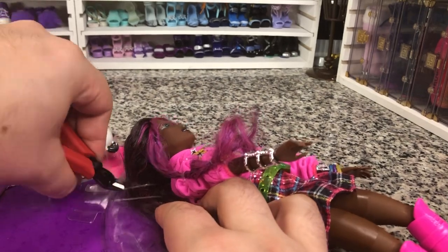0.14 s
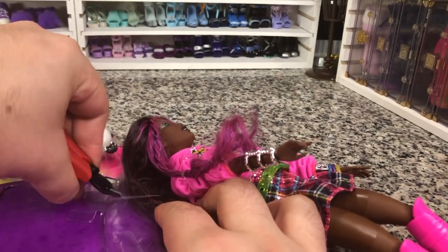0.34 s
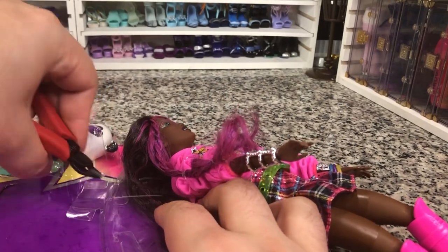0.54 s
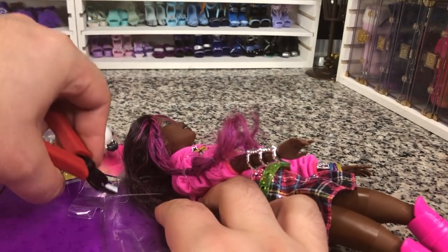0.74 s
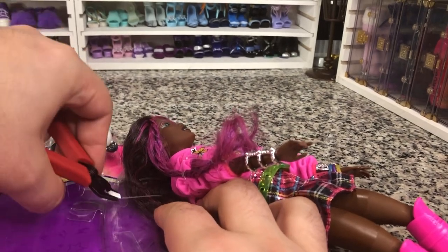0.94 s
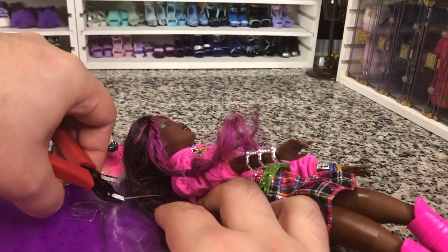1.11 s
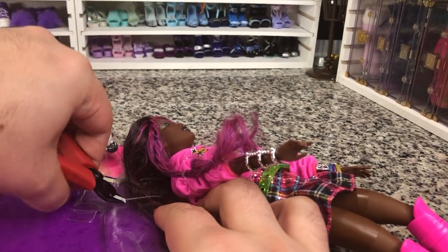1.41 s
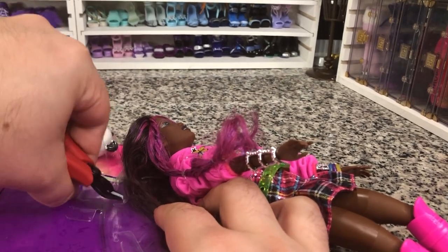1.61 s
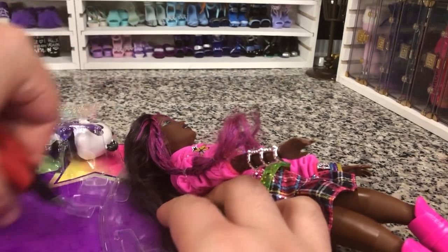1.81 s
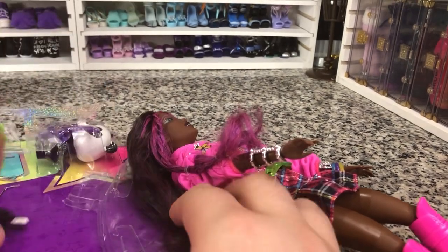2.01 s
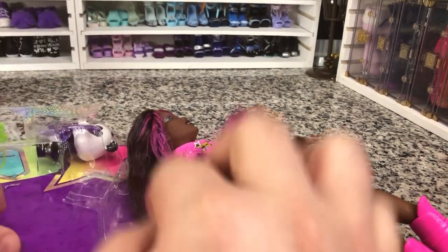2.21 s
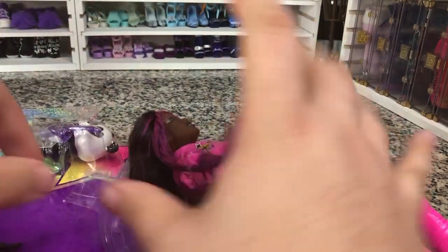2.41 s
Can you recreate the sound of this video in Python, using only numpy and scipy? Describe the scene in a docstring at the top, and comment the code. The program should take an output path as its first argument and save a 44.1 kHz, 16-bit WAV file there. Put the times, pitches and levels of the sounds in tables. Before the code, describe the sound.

Small nippers make two crisp, dry snips over a second apart, with light plastic ticks and rustling between; then the tray creaks, pops and thumps as a toy is pulled free, close-miked in a quiet room.

```python
"""In a small furnished room, nippers snip two rubber ties on a plastic and card toy tray on a stone counter.
Snips and tray cracks are spiked noise bursts with short rings, coloured by resonances, with a rattle and room tail.
Thumps are damped sines; the rustle is gritty noise of changing brightness; scrapes are narrow noise bands.
The tray ticks, creaks and rustles under the fingers, then pops and thumps as the toy is pulled loose.
Behind it lie shaped-noise room air and a wavering sine hum at mains pitch."""
import sys
import numpy as np
from scipy import signal
from scipy.fft import rfft, irfft, next_fast_len
from scipy.io import wavfile
from scipy.ndimage import uniform_filter1d, map_coordinates

SR = 44100
rng = np.random.default_rng(int(sys.argv[2]) if len(sys.argv) > 2 else 0)


def output_pcm(signal):
    """Save a mono or channel-first signal as 16-bit PCM at the path in sys.argv[1].

    Samples are clipped to [-1, 1] before scaling.
    """
    pcm = np.clip(np.atleast_2d(signal).T, -1, 1) * 32767
    wavfile.write(sys.argv[1], SR, np.round(pcm).astype(np.int16))


N = 112454  # length in samples

# Nipper snips and tray cracks, levels ahead of body and microphone colour: (time [s], level [dB],
# 0.2-0.9 kHz [dB over level], 0.9-2 kHz [dB over level], 2-4 kHz [dB over level],
# 11-16 kHz [dB over level], base t60 [s], ring pitch [Hz], ring [dB over level])
SNIPS = [(0.2347, -12, -26.5, -3.5, -1.5, 4.5, 0.0095, 1939, -5.5),
         (1.5921, -9, -18, -11, -2.5, -5.5, 0.013, 5520, 3)]
CRACKS = [(0.0766, -58, -17, 0, 1.5, -14, 0.012, 2100, -4),
          (0.1109, -45, -8, 0.5, -4, -9, 0.022, 3080, -3.5),
          (0.1328, -52, -20.5, -10, -4.5, 1, 0.014, 2100, -5),
          (0.2047, -46.5, -14.5, -13, 4.5, -11, 0.018, 2050, -8),
          (0.2463, -29, -1, 4, -4.5, -10, 0.013, 1970, -12),
          (0.2516, -32.5, 1, -14, -7, -14, 0.006, 4230, -3),
          (0.26, -27.5, -17, 4, -1.5, -14, 0.013, 2080, -5.5),
          (0.332, -48, -25, -10, 3, -4, 0.026, 3640, -3),
          (0.3618, -44, -22, 0, 3.5, -14, 0.019, 1840, -1.5),
          (0.368, -42.5, -18, -0.5, -5, -21, 0.018, 4900, 8), (0.3923, -56, -14, 9, 8, -14, 0.023, 2060, 2),
          (0.41, -37.5, -10.5, -11, -6, -12, 0.028, 3680, -6),
          (0.4721, -39.5, -13, -15, -13, -30, 0.019, 5550, -23),
          (0.5737, -56.5, -10, 7, -5, -26, 0.015, 1710, -10),
          (0.6654, -45, -12.5, -2.5, -4.5, -4, 0.006, 1965, -12.5),
          (0.787, -35, -5.5, -6, -5.5, -7.5, 0.019, 4060, -2),
          (0.8083, -48.5, -14.5, -11, -2, -2, 0.0098, 4180, 5),
          (0.8124, -48, -21, 1, -1, -18, 0.018, 3970, -4), (0.8193, -50, -24, 5, -1, -5, 0.016, 4040, 2),
          (0.8371, -56, -18, -15, -9, -3, 0.013, 4000, 6),
          (0.8476, -57.5, -14, -5, -7, -12, 0.011, 4090, 3),
          (1.0123, -58, -17, -5, 0, -13.5, 0.014, 4830, 1.5),
          (1.4247, -48.5, -26, 0.5, 1, -10, 0.022, 5840, -5.5),
          (1.4397, -50.5, -2, 0, 4.5, -6, 0.031, 3630, -1.5),
          (1.4476, -53, -9, 6, -3, -14, 0.018, 4690, -4),
          (1.4551, -49, -13.5, 3.5, 0.5, -15, 0.028, 1710, -7),
          (1.4595, -51, -22, -3, 1, -9, 0.021, 1680, -4),
          (1.4691, -46.5, -22, 4, 3.5, -14, 0.019, 2020, -4),
          (1.5449, -42, -4.5, 2, 0.5, -10, 0.032, 3530, 0.5), (1.562, -40, -3, -4, 2, -14, 0.021, 5260, -5),
          (1.8054, -48.5, -7, -28, -11, -16, 0.025, 6110, -17),
          (1.833, -43, -18, -19, -5, -6, 0.014, 2060, -11),
          (1.8616, -43.5, -1.5, -18, -22, -14, 0.016, 3310, -6),
          (1.909, -25.5, -19.5, 1, -2, -30, 0.012, 1750, -5.5),
          (1.9819, -45.5, -18.5, 0, -1, -14, 0.02, 3650, -8),
          (1.9936, -42, -3.5, -1, -15, -14, 0.027, 3300, 1),
          (1.9996, -34.5, -11, -8, -8, -10, 0.017, 3390, -2.5),
          (2.0045, -40, -7, -4, -3.5, -3, 0.022, 3140, 0), (2.093, -43, -12, -1.5, -3, -5, 0.016, 2780, -3),
          (2.1094, -35.5, -9, -15, -16, -3, 0.016, 3490, -12.5),
          (2.1285, -14.5, -11.5, -1.5, 0, -24, 0.0099, 2710, -10),
          (2.178, -25.5, -14, -1.5, 0, -12, 0.014, 2740, -1),
          (2.1949, -10.5, -8, 0, 0, -30, 0.014, 1800, -5),
          (2.2083, -10, -10.5, -1, -0.5, -15, 0.013, 1760, -10.5),
          (2.234, -31.5, -1.5, 0, 1, -9, 0.029, 1770, 3), (2.2923, -38, -26, 2.5, 2.5, -26, 0.015, 4110, 7),
          (2.41, -40.5, -25.5, -27, -15, -20.5, 0.043, 6100, 4.5)]
# Resonances of the nippers and of the plastic tray: (centre [Hz], width [Hz], lift [dB])
NIPPER_BODY = [(2050, 610, 11), (2700, 220, 6.5), (3430, 300, 3), (4200, 165, 6.5), (6360, 1100, 10),
               (14000, 320, -1.5), (14980, 500, 4.5)]
TRAY_BODY = [(1300, 150, 6), (1760, 150, 4), (2885, 400, -0.5), (3960, 140, 1.5), (5490, 1100, 3.5),
             (7750, 130, -7.5)]

# The five click bands; every per-band list follows this order: (low edge [Hz], high edge [Hz])
CLICK_BANDS_HZ = [(180, 900), (900, 2000), (2000, 4000), (11000, 15900), (4000, 10500)]
# Decay of each band: (t60 [times the click's base t60])
BAND_LIFE = [4.04, 1.86, 1.83, 0.98, 0.79]
# Onset of each band, as bending waves bring the treble first: (rise time constant [s])
BAND_RISE_S = [0.0016, 0.0013, 0.00067, 0.00016, .0002]
SNAP_DB = 10.5  # opening spike over the burst level
RING_CYCLES, RING_RISE_S = 31.3, 0.00033  # cycles to fall 60 dB; rise time constant
RATTLE_DB, RATTLE_LIFE = -25, 7  # weaker than the burst, lasting this many times longer
ROOM_DB, ROOM_RISE_S = -28.5, 0.0027  # room tail against the burst; rise time constant
ROOM_T60_S = [0.27, 0.3, 0.26, 0.22, 0.23]  # per click band

# Thumps of the card backing and counter: (time [s], level [dB], pitch [Hz], t60 [s])
THUMPS = [(0.238, -51, 210.4, 0.12), (0.787, -52, 238, 0.057), (1.592, -33.5, 212.5, 0.045),
          (1.594, -36, 625, 0.056), (2.129, -35.5, 113, 0.058), (2.132, -45.5, 230, 0.058),
          (2.2, -40.5, 327.3, 0.056), (1.594, -44, 316.7, 0.069), (2.196, -23, 201, 0.04),
          (2.198, -33.5, 142.2, 0.14), (2.21, -35, 70.2, 0.16), (2.194, -29, 551, 0.044)]
THUMP_RISE_S = 0.003  # time constant

# Rustle moves: (time [s], level before the tilt [dB], brightness [dB per octave])
RUSTLE = [(0, -61, -4), (.04, -75.5, -0.5), (.075, -77, -2), (.1, -63.5, -1), (.17, -65, 0), (.19, -71, -4),
          (.22, -60, 0), (.3, -61.5, -0.5), (.35, -57.5, 2), (.385, -65.5, -1), (0.431, -60.5, -1.5),
          (.455, -75, -5.5), (.6, -77.5, 0), (.66, -70, -1.5), (.75, -85.5, -4), (0.799, -73, -5),
          (.87, -80, -4.5), (1.38, -78.5, -2.5), (1.42, -75, 0.5), (1.5, -75.5, 1), (1.56, -69.5, 0),
          (1.7, -72, 0), (1.78, -68, -2), (1.81, -64, 0.5), (1.9, -62, -0.5), (1.96, -62.5, 1),
          (2.02, -59, -1.5), (2.06, -65, 2), (2.15, -57, -1), (2.22, -50, -0.5), (2.321, -60, 1),
          (2.36, -71.5, 1.5), (2.44, -66.5, 1.5), (2.48, -72.5, 1.5), (2.55, -76, -4)]
# Tone of the rubbing before the tilt: (frequency [Hz], relative density [dB per Hz])
RUB_TONE = [(240, -4.5), (500, -11.5), (1300, -2), (3000, -7), (6000, -6.5), (8800, -21.5), (11000, -14),
            (16000, -19)]
PIVOT_HZ, PATCHY_DB = 3000, 3  # tilt pivot; rms unevenness over time and pitch
GRAIN_DB, GRAIN_RATE = 2, 240  # grit depth; random knots a second

# Soft narrow scrapes: (start [s], end [s], centre [Hz], width [Hz], level [dB])
SCRAPES = [(0.46, 0.775, 1283, 402, -76.5), (0.505, 0.614, 4530, 503, -83.5),
           (1.603, 1.648, 4200, 500, -52.5), (1.684, 1.972, 3650, 598, -69), (1.94, 2.114, 3620, 820, -70),
           (2.295, 2.397, 3650, 700, -70)]
SCRAPE_FADE_S, SCRAPE_WAVER_DB = 0.04, 2

# Tone of the room air: (frequency [Hz], relative density [dB per Hz])
AIR_TONE = [(25, -5), (60, -9), (100, -8.5), (160, -16), (250, -13.5), (450, -22.5), (750, -28.5),
            (2000, -37.5), (6000, -41.5), (10000, -28.5), (16500, -40)]
AIR_DB, HUM_DB = -63.5, -63
HUM_HZ, HUM_DRIFT_HZ, HUM_WAVER_DB = 120, 1.5, 1.5

# Microphone tone: (frequency [Hz], gain [dB])
MIC_TONE = [(30, -19.5), (70, -3), (150, 2.5), (6500, 0.5), (8500, -8.5), (10500, -16.5), (13000, -9),
            (16000, -5)]
TOP_HZ = 16150  # upper limit of the microphone band


def snips():
    """Nipper clicks coloured by the resonances of the jaws."""
    return clicks(SNIPS, NIPPER_BODY)


def tray_cracks():
    """Ticks, creaks and pops coloured by the resonances of the plastic tray."""
    return clicks(CRACKS, TRAY_BODY)


def clicks(rows, body):
    """Each click excites the body with a spike and dying noise, beside one short ring, a rattle and a room tail."""
    t = np.arange(SR // 4) / SR
    band_count = len(CLICK_BANDS_HZ)
    # first axis: direct burst, then lingering rattle and room
    bands = np.zeros((2, band_count, N + len(t)))
    rings = np.zeros(N + len(t))
    rise = 1 - np.exp(-t / np.array(BAND_RISE_S)[:, None])
    room = amp(ROOM_DB - 60 * t / np.array(ROOM_T60_S)[:, None])
    room *= 1 - np.exp(-t / ROOM_RISE_S)
    ring_rise = 1 - np.exp(-t / RING_RISE_S)

    for start, db, *band_db, t60, hz, ring_db in rows:
        life = t60 * np.array(BAND_LIFE)[:, None]
        grit = rng.standard_normal((2, band_count, len(t)))
        # the square root evens out the burst's peaks
        grit[0] = np.sign(grit[0]) * np.sqrt(np.abs(grit[0]))
        grit *= rise
        grit[0, 2:, 1] = amp(SNAP_DB)  # one-sample spike in the bands above 2 kHz

        burst_decay = amp(-60 * t / life)
        rattle_decay = amp(RATTLE_DB - 60 * t / (RATTLE_LIFE * life))
        shape = np.array([burst_decay, rattle_decay + room])
        band_gain = amp(db + np.r_[band_db, 0])[:, None]  # 4-10.5 kHz sits at the click level
        first = round(start * SR)
        at = slice(first, first + len(t))
        bands[..., at] += band_gain * shape * grit

        ring_decay = amp(db + ring_db - 60 * t * hz / RING_CYCLES)
        rings[at] += ring_decay * ring_rise * np.sin(2 * np.pi * hz * t)

    mix = np.zeros((2, N))
    for k, edges in enumerate(CLICK_BANDS_HZ):
        bandpass = signal.butter(3, edges, "bandpass", fs=SR, output="sos")
        mix += signal.sosfilt(bandpass, bands[:, k, :N])
    burst, tail = mix

    def body_db(hz):
        return sum(lift / (1 + (2 * (hz - centre) / width) ** 2) for centre, width, lift in body)

    return causal(burst, body_db) + rings[:N] + tail


def thumps():
    """The card backing and counter sound as low damped rings with a soft start."""
    t = np.arange(N) / SR
    out = np.zeros(N)
    for start, db, hz, t60 in THUMPS:
        age = np.maximum(t - start, 0)
        decay = amp(db - 60 * age / t60)
        rise = 1 - np.exp(-age / THUMP_RISE_S)
        out += decay * rise * np.sin(2 * np.pi * hz * age)
    return out


def rustle():
    """Fingers and hair drag on plastic: patchy, gritty noise that turns brighter or duller."""
    times, level_db, tilt_db = np.transpose(RUSTLE)
    grit = rng.standard_normal(N) * amp(GRAIN_DB * wobble(GRAIN_RATE))
    rubbing = unit(filtered(grit, lambda f: amp(along(RUB_TONE, f))))
    hz, t, spectrum = signal.stft(rubbing, SR, nperseg=256)
    octaves = np.log2((hz[:, None] + 300) / PIVOT_HZ)  # the offset eases the tilt in the bass
    tilt = np.interp(t, times, tilt_db) * octaves
    patches = uniform_filter1d(rng.standard_normal(spectrum.shape), size=6, axis=0)
    patches = uniform_filter1d(patches, size=4, axis=1)
    coloured = spectrum * amp(tilt + PATCHY_DB * unit(patches))
    noise = signal.istft(coloured, SR, nperseg=256)[1][:N]
    return noise * amp(np.interp(np.arange(N) / SR, times, level_db))


def scrapes():
    """Soft scraping as narrow, wavering noise bands that fade in and out."""
    t = np.arange(N) / SR
    out = np.zeros(N)
    for start, end, hz, width, db in SCRAPES:
        noise = rng.standard_normal(N)
        band = unit(filtered(noise, lambda f: 1 / (1 + (2 * (f - hz) / width) ** 2)))
        # fades are centred on the start and end times
        gate = np.clip(np.minimum(t - start, end - t) / SCRAPE_FADE_S + 0.5, 0, 1)
        out += amp(db + SCRAPE_WAVER_DB * wobble(29.95)) * gate * band
    return out


def room_air():
    """Steady room air: noise shaped by its tone curve."""
    noise = rng.standard_normal(N)
    return amp(AIR_DB) * unit(filtered(noise, lambda f: amp(along(AIR_TONE, f))))


def mains_hum():
    """One sine at mains pitch, wavering in pitch and level."""
    hz = HUM_HZ + HUM_DRIFT_HZ * wobble(8)
    tone = np.sin(2 * np.pi * np.cumsum(hz) / SR)
    return amp(HUM_DB + HUM_WAVER_DB * wobble(13)) * tone


def amp(db):
    """dB to gain."""
    return 10 ** (np.asarray(db) / 20)


def unit(x):
    """Scaled to rms 1."""
    return x / np.sqrt(np.mean(x ** 2) + 1e-20)


def along(points, hz):
    """Curve through (Hz, value) points on a log frequency axis."""
    f, value = np.transpose(points)
    return np.interp(np.log(hz + 1), np.log(f + 1), value)


def wobble(rate):
    """A smooth random curve, rate knots a second."""
    return map_coordinates(rng.standard_normal(2000), [np.arange(N) * rate / SR], mode="wrap")


def filtered(x, response):
    """x through a real or complex response of frequency."""
    m = next_fast_len(N + SR // 2)  # padding leaves room for the filter tail
    return irfft(rfft(x, m) * response(np.fft.rfftfreq(m, 1 / SR)), m)[..., :N]


def causal(x, gain_db):
    """x through the minimum-phase filter with the given dB curve, so nothing rings ahead of a click."""
    def response(hz):
        cepstrum = irfft(gain_db(hz) * np.log(10) / 20)
        half = len(cepstrum) // 2
        folded = np.r_[cepstrum[0], 2 * cepstrum[1:half], np.zeros(len(cepstrum) - half)]
        return np.exp(rfft(folded))
    return filtered(x, response)


def scene():
    """Snips and cracks over thumps, rustle, scrapes, air and hum."""
    handling = snips() + tray_cracks() + thumps() + rustle() + scrapes()
    return (handling + room_air() + mains_hum())[None]


def record(dry):
    """A small microphone: thin bass, a dip near 10 kHz and a steep upper band limit."""
    toned = causal(dry, lambda hz: along(MIC_TONE, hz))
    return filtered(toned, lambda hz: 1 / (1 + (hz / TOP_HZ) ** 120))


dry = scene()
out = record(dry)
output_pcm(out)
```